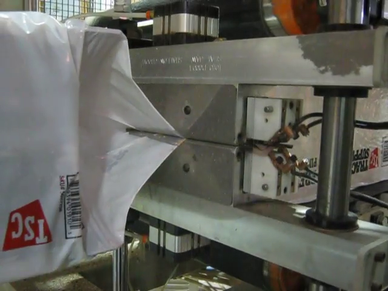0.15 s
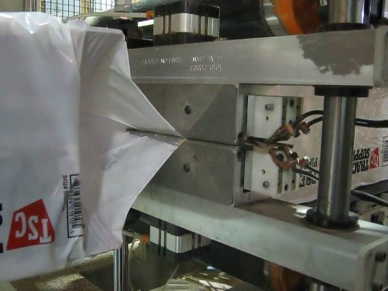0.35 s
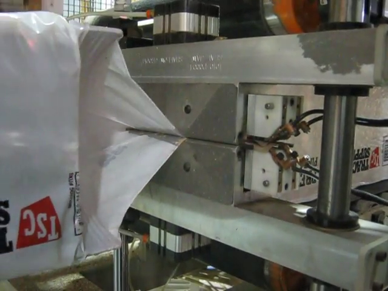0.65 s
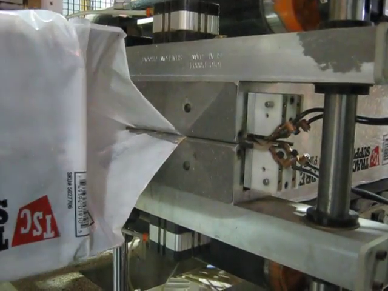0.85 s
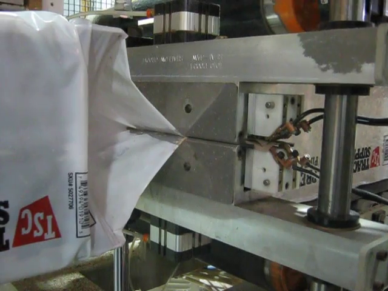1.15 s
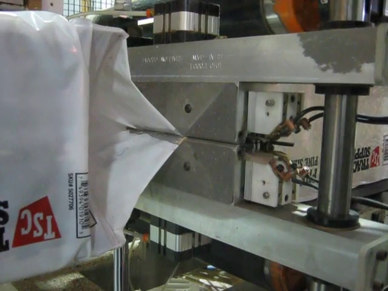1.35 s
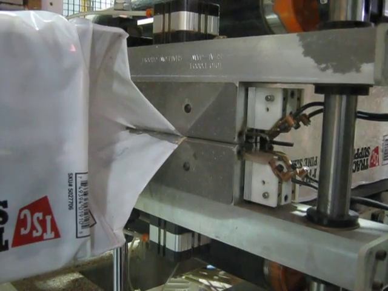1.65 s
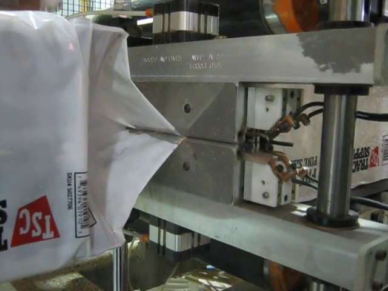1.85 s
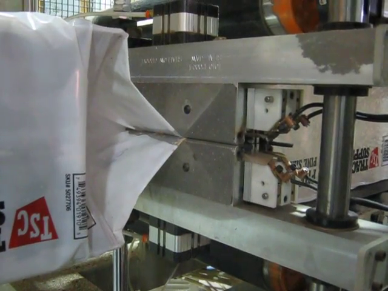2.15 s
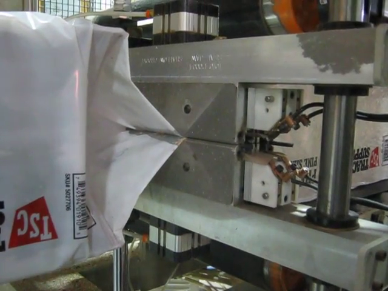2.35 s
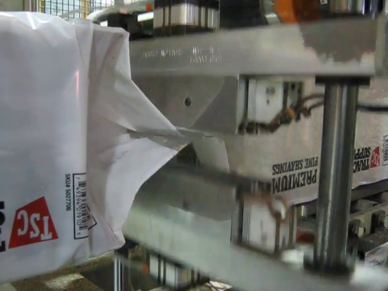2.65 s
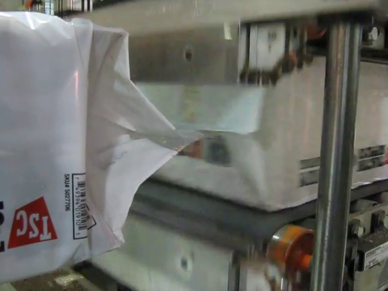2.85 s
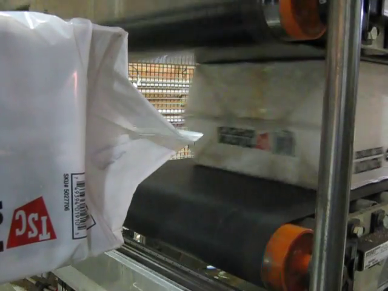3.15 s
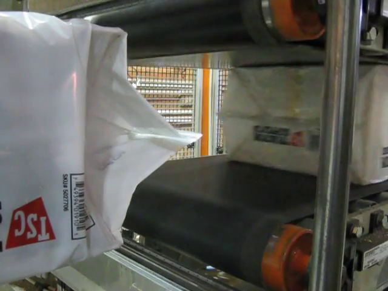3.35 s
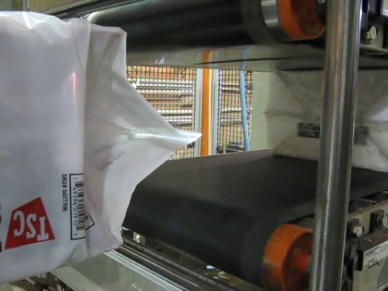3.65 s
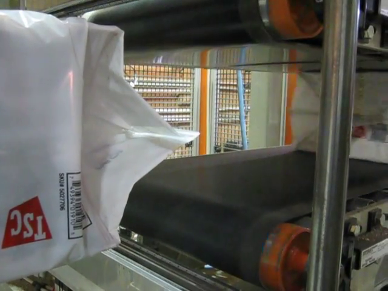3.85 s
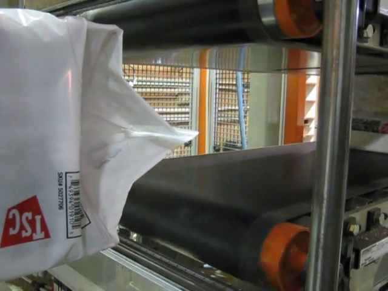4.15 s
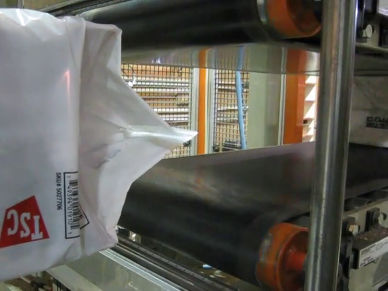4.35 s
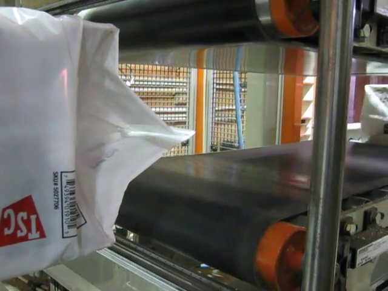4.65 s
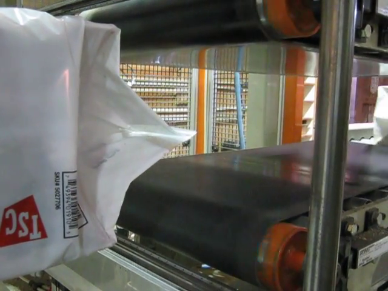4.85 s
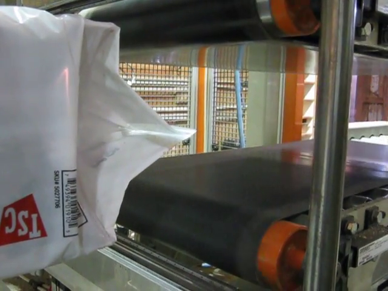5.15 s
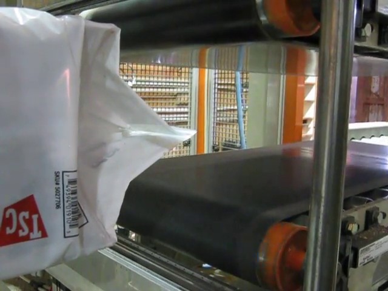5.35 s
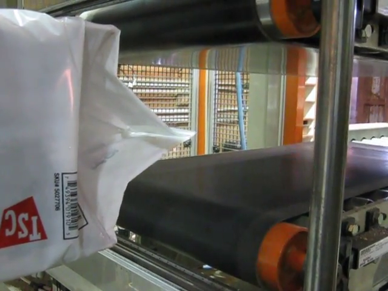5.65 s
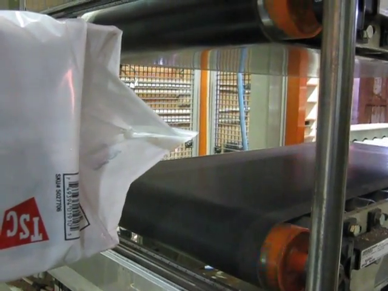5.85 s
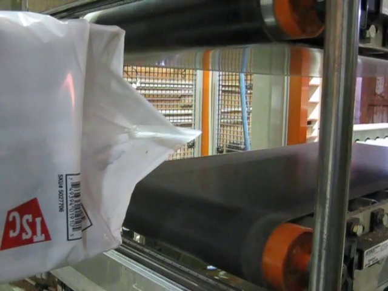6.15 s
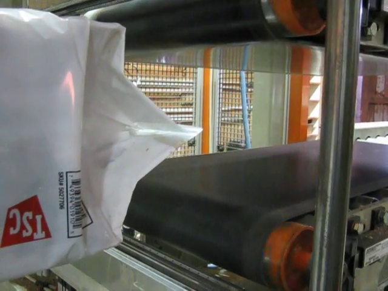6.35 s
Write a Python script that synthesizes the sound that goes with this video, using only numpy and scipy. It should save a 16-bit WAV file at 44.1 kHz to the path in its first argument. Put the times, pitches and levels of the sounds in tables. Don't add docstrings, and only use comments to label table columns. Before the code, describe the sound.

Close to a bagging machine in a factory hall, a vacuum pump hums and gear motors whine over belt rumble and bright hissing air. Light ticks come first, then a heavy thud and a cluster of sharp clacks within the first second and a half. The middle is mostly steady hum and whine, until a loud clatter near the end cuts the hum briefly. The small microphone sounds dull on top and dips after knocks.

```python
import sys
import numpy as np
from scipy import signal
from scipy.fft import rfft, irfft, next_fast_len
from scipy.io import wavfile
from scipy.ndimage import uniform_filter1d

SR = 44100
rng = np.random.default_rng(int(sys.argv[2]) if len(sys.argv) > 2 else 0)


def boost_factor(decibels):
    exponent = np.asarray(decibels, float) / 20
    return 10 ** exponent


def int16_out(signal):
    q = np.round(np.clip(np.atleast_2d(signal).T, -1, 1) * 32767)
    wavfile.write(sys.argv[1], SR, q.astype(np.int16))


N = 286650

# time_s, pitch_hz
VANE_HZ = [(0, 267.6), (.7, 267.1), (1.5, 266.8), (2.9, 266.7), (4, 267.1), (5, 267.8), (5.6, 267.9),
           (5.8, 267.2), (6.15, 267.2), (6.17, 270), (6.5, 270)]
# time_s, level_db
HUM = [(0, -24), (.45, -24.5), (.6, -24.5), (.92, -19.5), (1.0, -21.5), (1.22, -21), (1.4, -26),
       (1.5, -26.5), (1.8, -31), (2.5, -26), (2.91, -24), (3.08, -21), (3.67, -17), (5.36, -17.5),
       (5.6, -26), (5.8, -32), (5.91, -23.5), (6.15, -24)]
# start_s, end_s, level_db
SURGES = [(.07, .125, -37.5), (.2, .32, -47.5), (.38, .425, -33.5), (.52, .6, -29.5), (.62, .67, -34.5),
          (.76, .8, -41.5), (.862, .876, -30.5), (.9, .934, -28), (1.09, 1.13, -30), (1.16, 1.188, -24),
          (1.555, 1.665, -38), (2.53, 2.6, -40), (2.96, 3.05, -38.5), (3.04, 3.115, -30)]
# start_s, end_s, depth_db
CUTS = [(0.701, 0.713, 2), (0.94, 0.952, 8.5), (0.95, 0.96, 7), (1.197, 1.206, 6.5), (1.252, 1.298, 13.5),
        (1.305, 1.436, 7.5), (1.223, 1.25, 8), (1.501, 1.548, 1.5), (5.61, 5.739, 14), (6.138, 6.6, 12.5)]
# level_db at usual effort, follow_db per dB of effort
LOW_ORDERS = [
    (-36.5, 0.6),
    (-39.5, 0.6),
    (-45, 0.6),
]
# start_s, end_s, level_db
FIRST_SPELLS = [(-.1, .32, -31.5), (.4, .56, -44), (.86, .95, -39.5), (1.5, 3.0, -47), (3.0, 5.6, -35),
                (3.35, 3.5, -41), (2.85, 3.1, -48.5)]
# start_s, end_s, level_db
THIRD_SPELLS = [(.45, .6, -40.5), (1.9, 3.0, -52.5), (3.02, 3.3, -42), (3.3, 4.9, -35), (4.9, 5.35, -40),
                (5.35, 5.52, -38), (5.54, 5.59, -27.5), (5.92, 6.3, -42.5), (-.1, .45, -46)]
# start_s, end_s, level_db
FOURTH_SPELLS = [(3.05, 3.5, -49), (4.42, 5.52, -40.5), (5.9, 6.2, -42.5)]
# order, level_db when the second order is at -20 dB
HIGH_ORDERS = [(5, -44), (6, -49), (8, -50), (9, -52), (10, -54), (11, -54)]
# start_s, end_s, order, level_db
SINGING = [(5.87, 6.145, 8, -38), (5.8, 6.14, 6, -44), (6.285, 6.6, 7, -36.5), (6.2, 6.4, 5, -38.5),
           (6.4, 6.6, 5, -42), (6.3, 6.5, 9, -46), (0, .5, 8, -46), (4.2, 5.5, 5, -49)]
# pitch_hz, width_hz, level_db
NOZZLE = [
    (4820, 1400, -43),
    (3800, 650, -58),
]
# start_s, end_s
JAWS_OPEN = (2.6, 5.6)

WHINE_HZ, DRIVE_HZ, DRUM_HZ = 1306.5, 365.8, 238.3
WHINE_IDLE_DB, DRIVE_IDLE_DB, OCTAVE_DB, DRUM_DB = -46, -51.5, -62, -39.5
# start_s, end_s, level_db
WHINE_SPELLS = [(-.1, .6, -36.5), (.7, 1.23, -49.5), (1.6, 2.85, -44), (2.85, 3.44, -39.5),
                (3.02, 3.46, -39), (3.46, 4.25, -37), (4.25, 5.4, -57.5), (5.7, 5.85, -47.5),
                (5.82, 6.15, -33.5)]
# start_s, end_s, level_db
DRIVE_SPELLS = [(-.1, .1, -42), (.45, 1.3, -44), (3.11, 3.7, -43.5), (3.85, 4.3, -30), (4.3, 4.8, -39),
                (4.8, 5.08, -34.5), (5.24, 5.36, -35), (5.52, 5.61, -25.5), (5.9, 6.15, -32),
                (6.15, 6.6, -35.5)]
# pitch_hz, width_hz, level_db
FAINT = [(60, 14, -49), (730, 20, -47), (882, 10, -45), (3106, 14, -57), (4910, 30, -57)]

# time_s, level_db
LOAD = [(0, -26), (.08, -27.5), (.2, -26.5), (.55, -28), (.63, -33.5), (.9, -26), (1.07, -29),
        (1.21, -24.5), (1.24, -33), (1.45, -32), (1.77, -37), (2.95, -33.5), (3.09, -28), (5.3, -28),
        (5.595, -26), (5.615, -30), (5.82, -27), (6.5, -21)]
# pitch_hz, level_db per Hz
RUMBLE = [(20, -20.5), (40, -10), (60, -0.5), (90, -3), (140, 1.5), (220, 1.5), (330, -2), (500, -27.5),
          (800, -28.5)]
# pitch_hz, level_db per Hz
ROLLERS = [(150, -21.5), (250, -4.5), (400, -1.5), (600, -1), (850, -2), (1100, -8), (1500, -13),
           (2500, -32)]
RUMBLE_DB, RUMBLE_FOLLOWS = -37.5, 0.81
# start_s, end_s, level_db
SHAKES = [(.3, .6, -55.5), (.84, .9, -44), (1.22, 1.28, -43.5), (3.15, 3.3, -41), (3.43, 3.49, -41),
          (5.58, 5.612, -24.5), (5.62, 5.77, -47.5), (5.79, 6.0, -32), (6.2, 6.6, -38.5)]
# start_s, end_s, level_db
BUMPS = [(.23, .29, -38.5), (.67, .72, -31), (.925, .98, -28.5), (1.33, 1.375, -32), (3.38, 3.45, -35),
         (5.32, 5.41, -36.5), (5.8, 5.86, -36.5), (5.95, 5.99, -34), (6.035, 6.065, -29.5),
         (6.12, 6.17, -31), (6.26, 6.3, -35), (6.47, 6.6, -35)]

# time_s, level_db
FLOW = [(0, -28), (.68, -28.5), (.73, -42.5), (.92, -37), (1.0, -49.5), (1.228, -31.5), (1.24, -28),
        (1.68, -25.5), (1.71, -28.5), (2.47, -28.5), (2.51, -32), (3.3, -34.5), (5.3, -37), (5.43, -44),
        (5.575, -30.5), (5.66, -45.5), (5.95, -33), (6.5, -28.5)]
# pitch_hz, level_db per Hz
JET_BODY = [(700, -26.5), (1100, -9.5), (1500, -4), (2200, -2.5), (3000, -5), (4000, -14), (6000, -21)]
# pitch_hz, level_db per Hz
JET_TOP = [(1800, -17.5), (2800, -5), (3600, 0), (4400, -1.5), (5000, -2.5), (5300, -2.5), (5600, -7.5)]
BODY_DB, BODY_FOLLOWS, RUSTLE_BELOW_LOAD_DB = -34, 1, -7.5
# start_s, end_s, level_db
PUFFS = [(-.1, .03, -35.5), (.11, .14, -28), (.25, .39, -45.5), (.668, .72, -34), (.928, .975, -37),
         (.98, 1.2, -51.5), (1.24, 1.31, -29.5), (2.43, 2.48, -45), (3.05, 3.12, -46), (3.17, 3.23, -50.5),
         (3.0, 3.45, -44), (3.45, 3.9, -41.5), (3.9, 4.3, -48), (5.582, 5.59, -31), (5.595, 5.62, -31),
         (5.8, 5.86, -39.5), (6.46, 6.6, -36)]
PUFF_TOP_DB = -13

# time_s, peak_db
TICKS = [(.007, -21.5), (.019, -20.5), (.093, -16.5), (.127, -15.5), (.132, -14), (0.288, -21.5),
         (0.9265, -12), (0.9295, -10.5), (0.932, -9), (1.223, -11.5), (1.24, -17), (1.291, -16),
         (1.334, -16.5), (1.353, -18), (1.364, -15.5), (5.306, -20), (5.355, -16.5), (5.36, -15),
         (5.583, -16), (5.597, -14), (5.604, -16)]
# pitch_hz, level_db per Hz
LATCH = [(500, -15.5), (1500, -0.5), (3000, 6.5), (4500, -1), (5500, -1)]
# time_s, peak_db, pitch_hz, t60_s
PINGS = [(.011, -23.5, 3540, .03), (.021, -23, 3550, .03), (.009, -22.5, 2366, 0.028),
         (.017, -17, 2124, .025), (.032, -25, 2257, .03), (.092, -18, 3450, .02),
         (0.126, -14.5, 2550, 0.029), (.126, -17.5, 2300, .025), (.132, -18.5, 1890, .02),
         (.29, -21, 2090, .03), (.332, -23.5, 2180, .03), (.361, -24.5, 1930, .025),
         (.926, -24, 2505, 0.018), (.9265, -22.5, 3300, .025), (.927, -20, 3780, 0.024),
         (.9275, -17, 4360, .022), (.932, -19, 2740, 0.018), (.931, -18.5, 1824, .025),
         (.929, -15.5, 1208, .035), (.93, -13, 823, .04), (.969, -22.5, 1470, 0.037),
         (1.222, -17, 1960, .018), (1.222, -18.5, 2346, .018), (1.222, -21, 2740, .018),
         (1.371, -21, 1004, .035), (1.336, -21.5, 1142, .03), (1.422, -26, 1650, 0.055),
         (1.223, -22.5, 4290, .02), (1.268, -22, 1710, .09), (5.306, -27, 3150, .03),
         (5.322, -15.5, 944, .04), (5.327, -20, 1760, 0.049), (5.352, -23.5, 1860, .06),
         (5.359, -13.5, 1060, 0.047), (5.372, -24, 1950, .04), (5.376, -16, 1062, 0.068),
         (5.582, -13.5, 812, .04), (5.586, -20, 2664, 0.023), (5.596, -17.5, 1955, .025),
         (5.596, -13, 1223, .025), (5.6025, -7.5, 882, 0.036), (5.615, -23, 2820, 0.032),
         (5.657, -23, 995, .03)]
# time_s, peak_db, pitch_hz, t60_s
THUDS = [(0.207, -29.5, 272, .15), (0.249, -14, 266, 0.17), (0.278, -27, 193, 0.35),
         (0.6888, -7, 291, 0.055), (.689, -17, 391, 0.037), (.708, -19, 260, .06), (.724, -18.5, 240, .06),
         (0.756, -19.5, 247, 0.079), (.79, -26, 268.5, 0.055), (0.827, -24, 262, .06),
         (0.689, -19, 170.5, 0.19), (.701, -21, 200, .1), (.737, -20, 165.7, 0.11),
         (.861, -21, 224.4, 0.06), (0.928, -24, 310, 0.045), (1.17, -19, 273.4, 0.11),
         (1.206, -16, 231, 0.041), (1.288, -16, 361, 0.035), (1.296, -18.5, 697, .04),
         (1.306, -15, 563, 0.044), (1.322, -21, 555, 0.039), (1.332, -12.5, 410, 0.049),
         (1.3395, -14.5, 320, 0.028), (1.349, -15.5, 555, 0.064), (1.365, -24, 318, .07),
         (1.412, -19.5, 261.5, 0.044), (3.389, -24, 345, 0.13), (3.076, -23.5, 214, 0.18),
         (3.165, -18.5, 343, .15), (5.54, -20, 249, 0.066), (5.551, -15, 330, .04), (5.576, -18, 331, .04),
         (3.2, -22.5, 189, .15), (5.594, -25, 200, .06), (5.601, -18.5, 414, 0.065), (5.848, -16, 204, .1),
         (6.08, -13, 234, 0.072), (6.49, -16.5, 421, 0.057)]
# middle_s, half_length_s, pitch_hz, level_db
SWELLS = [(5.388, .014, 870, -27.5), (6, 0.013, 970, -25.5), (.752, 0.02, 185, -28.5),
          (.9, 0.028, 262, -29.5), (5.965, .05, 800, -32.5), (.8, 0.02, 890, -34.5),
          (6.6, 0.058, 870, -30.5), (6.9, .04, 810, -30), (6.15, .06, 710, -28), (6.19, .05, 1000, -35),
          (6.25, .06, 883, -33), (6.26, 0.075, 780, -32.5), (7.2, .07, 725, -30.5), (6.454, .09, 735, -27),
          (6.44, 0.036, 810, -35), (7.6, .08, 360, -23.5), (6.12, 0.046, 365, -32), (6.36, .07, 363, -29.5),
          (7.6, .06, 363, -25), (3.66, 0.082, 350, -35.5), (.25, .06, 400, -31), (0.59, 0.1, 310, -34.5),
          (0.52, 0.055, 340, -30.5)]
# start_s, end_s, centre_hz, width_hz, level_db
SCRAPES = [(5.285, 5.42, 1050, 810, -29.5), (5.31, 5.41, 1600, 760, -37), (1.285, 1.375, 950, 1600, -32),
           (1.235, 1.29, 2000, 2400, -32.5), (.935, .99, 1300, 1600, -28.5), (.668, .72, 2300, 1600, -33.5),
           (1.38, 1.47, 1400, 830, -38.5), (.285, 0.45, 2150, 900, -35)]
# time_s, peak_db, centre_hz, t60_s
CLACKS = [(.668, -20.5, 1496, .12), (.862, -16.5, 805, 0.029), (.927, -15, 1770, 0.06),
          (.939, -17, 1353, 0.12), (1.288, -18.5, 1500, 0.06), (1.332, -16, 957, .09),
          (1.365, -21, 1017, 0.07), (3.165, -19, 411, 0.13), (3.33, -18, 1550, 0.045),
          (5.318, -20, 1000, 0.2), (5.584, -26, 2600, 0.03), (5.596, -18, 1200, 0.05),
          (5.81, -36.5, 2300, 0.022), (6.488, -16.5, 1094, .12)]
# time_s, peak_db, centre_hz, t60_s
CLANGS = [
    (1.983, -21, 2750, 0.036),
    (3.165, -21, 430, 0.12),
    (3.185, -18.5, 474, .08),
]
# time_s, peak_db, t60_s
SNAPS = [(.698, -24.5, .02), (.926, -26, .04), (1.222, -21.5, 0.017), (5.596, -19, 0.027),
         (5.614, -21.5, 0.033), (2.46, -22.5, 0.039), (3.1, -27.5, 0.068)]
# start_s, end_s, pitch_hz, level_db
BUZZ = (1.33, 1.485, 136, -32.5)

# time_s, depth_db, recovery_s
DUCKS = [
    (.136, 5, 0.047),
    (.7, 2.5, 0.037),
    (.935, 2, 0.037),
    (1.225, 2, 0.056),
    (1.378, 1.5, 0.032),
    (5.606, 0, 0.24),
]
# pitch_hz, level_db
SMOOTHING = [(20, -2.5), (4500, 0), (5100, 0), (5600, -2.5), (6100, -12.5), (6500, -23), (6900, -38),
             (7200, -45)]


def evened(x):
    return x / np.sqrt(np.mean(x ** 2) + 1e-20)


def columns(rows):
    s, *values = np.transpose(rows)
    return [np.interp(np.arange(N) / SR, s, v) for v in values]


def add(mix, s, sound):
    part = mix[round(s * SR):][:len(sound)]
    part += sound[:len(part)]


def coloured(x, points):
    size = next_fast_len(len(x))
    f, db = np.transpose(points)
    log_hz = np.log(np.fft.rfftfreq(size, 1 / SR) + 1)
    gain = boost_factor(np.interp(log_hz, np.log(f), db))
    return irfft(rfft(x, size) * gain, size)[:len(x)]


def resonate(x, hz, width):
    turn = np.exp(2j * np.pi * hz * np.arange(len(x)) / SR)
    r = np.exp(-np.pi * width / SR)
    return 2 * (turn * signal.lfilter([1 - r], [1, -r], x / turn)).real


def band(x, hz, width):
    return evened(resonate(resonate(x, hz, width), hz, width))


def wander(per_s):
    steps = rng.standard_normal(400)
    return evened(np.interp(np.arange(N) / SR * per_s, np.arange(400), steps))


def spells(rows, edge_s=.012):
    t = np.arange(0, N, 32) / SR
    height = 0
    for start, end, db in rows:
        inside_s = np.minimum(t - start, end - t)
        height = height + boost_factor(db) * np.clip(inside_s / edge_s + .5, 0, 1)
    return np.interp(np.arange(N) / SR, t, height)


def gate(start, end, edge_s=.012):
    return spells([(start, end, 0)], edge_s)


def plus(db, height):
    return 20 * np.log10(boost_factor(db) + height)


def tone(turns, db, waver_db=0.5):
    return -np.sqrt(2) * boost_factor(db + waver_db * wander(25)) * np.cos(2 * np.pi * turns)


def rush(points, level_db, flicker_db, ticks_per_s, tick_db):
    heights = boost_factor(4.6 * np.minimum(rng.exponential(1, N), 4))
    signs = rng.choice([-1., 1.], N)
    loose_parts = heights * signs * (rng.random(N) < ticks_per_s / SR)
    drive = rng.standard_normal(N) + boost_factor(tick_db) * evened(loose_parts)
    return boost_factor(level_db + flicker_db * wander(45)) * evened(coloured(drive, points))


def pump():
    cut_db = sum(db * gate(start, end, edge_s=0.0088) for start, end, db in CUTS)
    hum_db = plus(columns(HUM)[0], spells(SURGES, edge_s=0.0083)) - cut_db + 0.19 * wander(18)
    effort_db = hum_db + 20.5
    first_db, third_db, fourth_db = (db + share * effort_db + wander(9) for db, share in LOW_ORDERS)
    first_db = plus(first_db, spells(FIRST_SPELLS, edge_s=0.31))
    third_db = plus(third_db, spells(THIRD_SPELLS, edge_s=0.027))
    fourth_db = plus(fourth_db, spells(FOURTH_SPELLS, edge_s=0.065))
    turns = np.cumsum(columns(VANE_HZ)[0]) / SR
    out = np.zeros(N)
    for order, db in enumerate([first_db, hum_db, third_db, fourth_db], start=1):
        out += tone(order * turns, db, waver_db=0.25)
    for order, db in HIGH_ORDERS:
        out += tone(order * turns, db + .8 * (hum_db + 20), waver_db=2.5)
    for start, end, order, db in SINGING:
        out += tone(order * turns, db, waver_db=2.4) * gate(start, end, edge_s=.03)
    openness = 0.31 + 0.64 * gate(*JAWS_OPEN)
    for hz, width, db in NOZZLE:
        out += boost_factor(db + .3 * effort_db) * openness * band(rng.standard_normal(N), hz, width)
    return out


def motors():
    t = np.arange(N) / SR
    load_db = uniform_filter1d(columns(LOAD)[0], size=12000) + 30
    out = tone(WHINE_HZ * t, plus(WHINE_IDLE_DB, spells(WHINE_SPELLS, edge_s=0.096)), waver_db=0.8)
    out += tone(DRIVE_HZ * t, plus(DRIVE_IDLE_DB, spells(DRIVE_SPELLS, edge_s=0.089)), waver_db=2.0)
    out += tone(2 * DRIVE_HZ * t, OCTAVE_DB + 1.4 * load_db, waver_db=-3.5)
    out += tone(DRUM_HZ * t, DRUM_DB + np.minimum(load_db, 2.5), waver_db=2.5)
    for hz, width, db in FAINT:
        out += boost_factor(db + np.minimum(load_db, 3.5)) * band(rng.standard_normal(N), hz, width)
    return out


def belts():
    load_db = columns(LOAD)[0]
    rumble_db = plus(RUMBLE_DB + RUMBLE_FOLLOWS * (load_db + 33.0), spells(SHAKES, edge_s=0.038))
    rollers_db = plus(load_db, spells(BUMPS, edge_s=0.039))
    return rush(RUMBLE, rumble_db, 0.8, 60, -17) + rush(ROLLERS, rollers_db, 0.5, 300, -21)


def air():
    flow_db, puffs = columns(FLOW)[0], spells(PUFFS, edge_s=.012)
    rustle = boost_factor(columns(LOAD)[0] + RUSTLE_BELOW_LOAD_DB)
    body_db = plus(BODY_DB + BODY_FOLLOWS * (flow_db + 30.5), rustle + puffs)
    top_db = plus(flow_db, boost_factor(PUFF_TOP_DB) * puffs)
    return rush(JET_BODY, body_db - 3.0, 0.39, 400, -11.0) + rush(JET_TOP, top_db, 0.78, 600, -10.0)


def ticks():
    s, db = np.transpose(TICKS)
    spikes = np.zeros(N)
    spikes[np.round(s * SR).astype(int)] = boost_factor(db + 8.5)
    return coloured(spikes, LATCH)


def pings_and_thuds():
    out, t = np.zeros(N), np.arange(SR // 4) / SR
    for rows, rise_s in (PINGS, .0005), (THUDS, 0.0011):
        for s, db, hz, t60 in rows:
            swing = np.sin(2 * np.pi * hz * t) * np.minimum(t / rise_s, 1)
            add(out, s, boost_factor(db - 60 * t / t60) * swing)
    return out


def plate():
    out = np.zeros(N)
    for middle, length, hz, db in SWELLS:
        t = np.arange(0, 2 * length, 1 / SR)
        add(out, middle - length, boost_factor(db + 5) * np.hanning(len(t)) * np.sin(2 * np.pi * hz * t))
    return out


def scrapes():
    grain = rng.standard_normal(N) * boost_factor(wander(45))
    out = np.zeros(N)
    for start, end, hz, width, db in SCRAPES:
        out += boost_factor(db) * band(grain, hz, width) * gate(start, end, edge_s=0.033)
    return out


def clacks_and_clangs():
    out, t = np.zeros(N), np.arange(SR // 4) / SR
    for rows, share in (CLACKS, 0.61), (CLANGS, 0.15):
        for s, db, hz, t60 in rows:
            rattle = band(rng.standard_normal(len(t)), hz, share * hz)
            rise = np.minimum(t / (0.031 * t60), 1)
            add(out, s, boost_factor(db - 3.0 - 60 * t / t60) * rattle * rise)
    return out


def snaps():
    out, t = np.zeros(N), np.arange(4000) / SR
    for s, db, t60 in SNAPS:
        burst = evened(coloured(rng.standard_normal(len(t)), LATCH))
        add(out, s, boost_factor(db - 8.5 - 60 * t / t60) * burst * np.minimum(t / .001, 1))
    return out


def valve():
    start, end, hz, db = BUZZ
    since = np.arange(N) / SR - start
    turns = hz * since * (1.01 - .07 * since)
    return tone(turns, db - 12 * since.clip(0, 1), waver_db=1.2) * gate(start, end)


def scene():
    steady = pump() + motors() + belts() + air()
    struck = ticks() + pings_and_thuds() + clacks_and_clangs() + snaps()
    return (steady + struck + plate() + scrapes() + valve())[None]


def coarsely_sampled(x):
    coarse = 4
    spectrum = rfft(x)
    spectrum[np.fft.rfftfreq(N, 1 / SR) > SR / coarse / 2] = 0
    kept = coarse * irfft(spectrum, N) * (np.arange(N) % coarse == 0)
    return coloured(kept, SMOOTHING + [(7700, -120), (20000, -120)])


def band_limit(x):
    return signal.sosfilt(signal.butter(12, 7030, fs=SR, output="sos"), x)


def record(dry):
    t = np.arange(N) / SR
    dip_db = np.zeros(N)
    for s, db, back in DUCKS:
        dip_db += db * np.clip((t - s) / 0.001, 0, 1) * np.exp(-np.maximum(t - s, 0) / back)
    ceiling = 0.5
    limited = ceiling * np.tanh(dry[0] * boost_factor(-dip_db) / ceiling)
    mix = coarsely_sampled(limited)[None] - .003
    return band_limit(mix)


dry = scene()
out = record(dry)
int16_out(out)
```